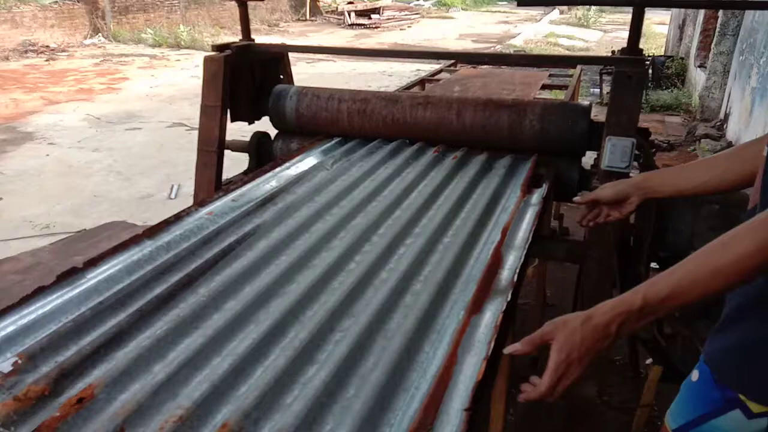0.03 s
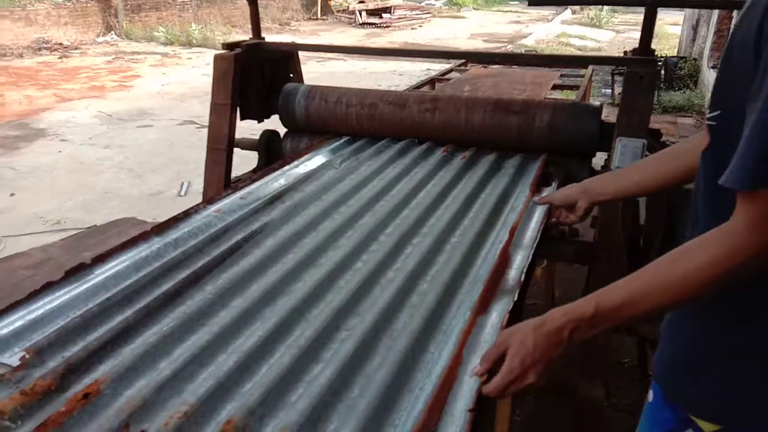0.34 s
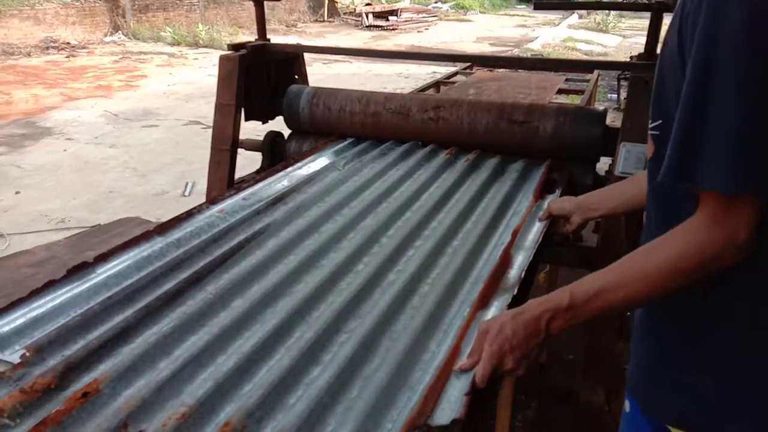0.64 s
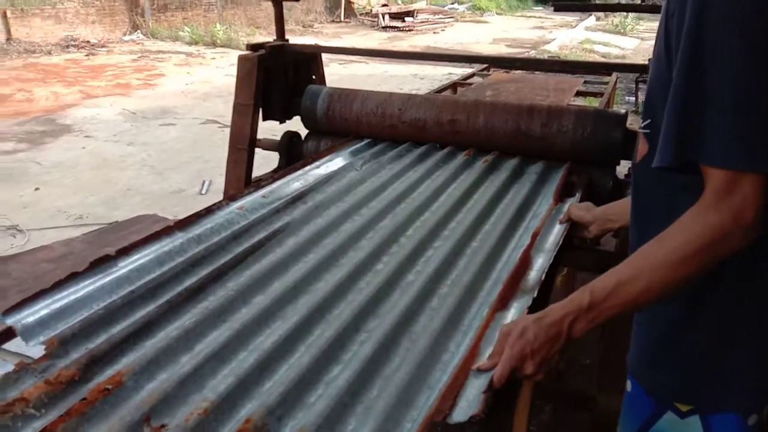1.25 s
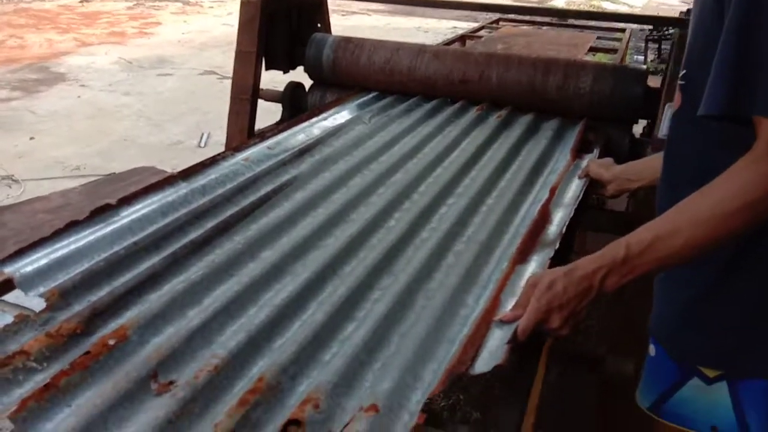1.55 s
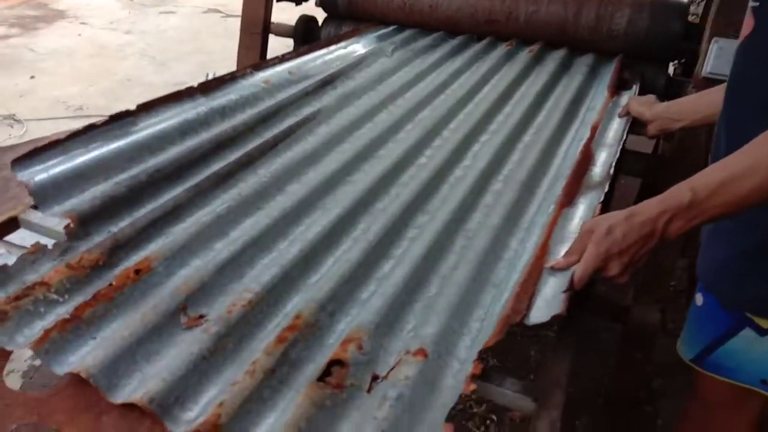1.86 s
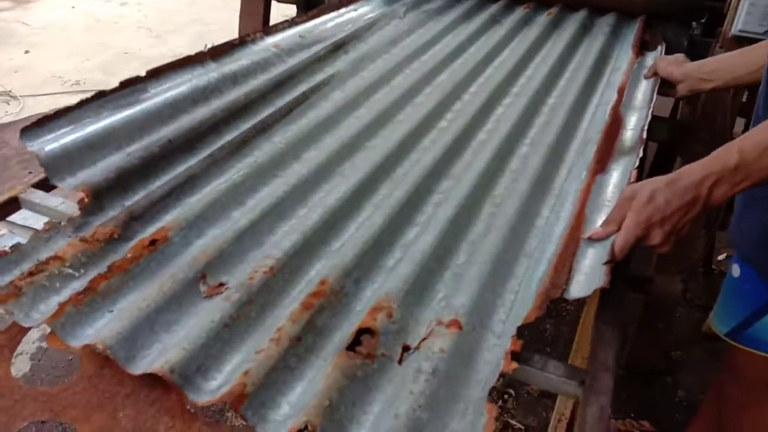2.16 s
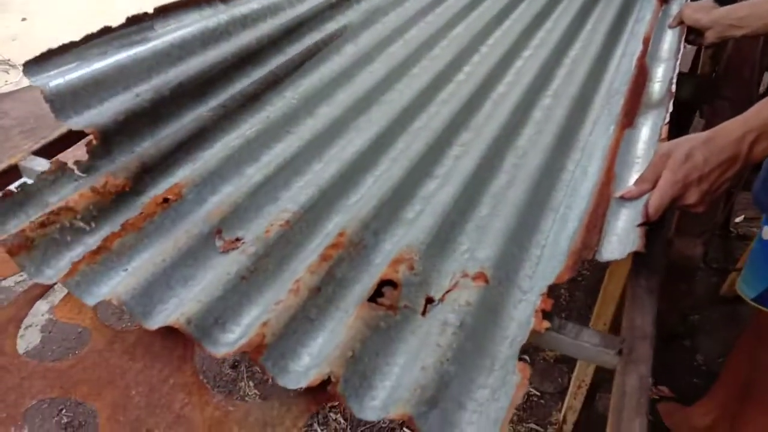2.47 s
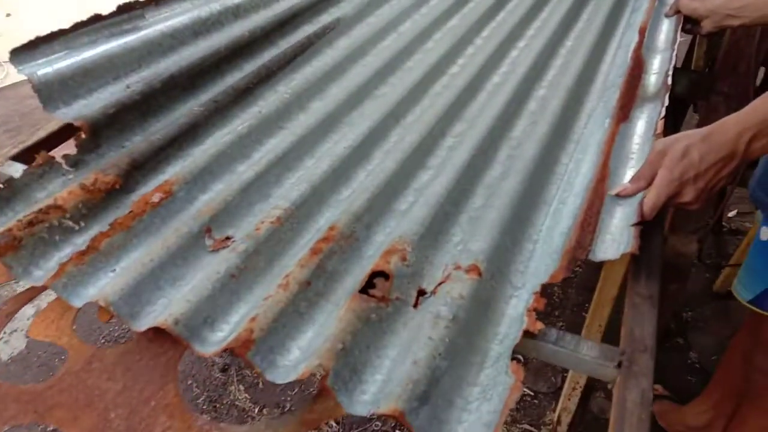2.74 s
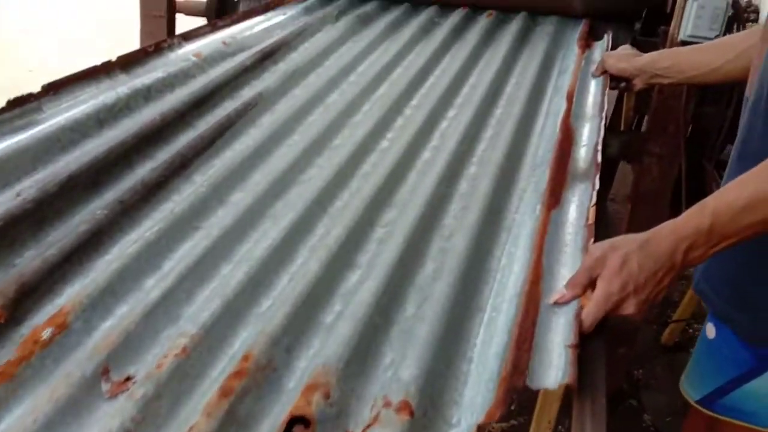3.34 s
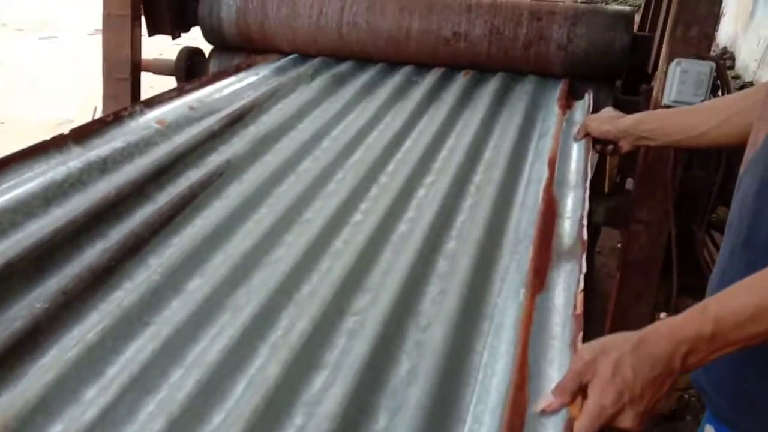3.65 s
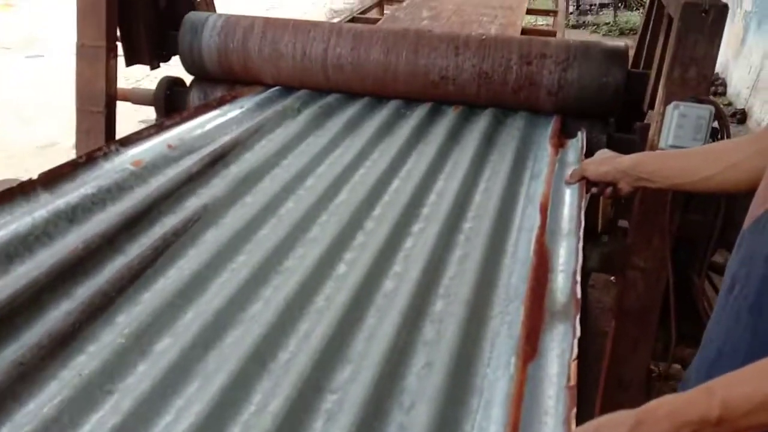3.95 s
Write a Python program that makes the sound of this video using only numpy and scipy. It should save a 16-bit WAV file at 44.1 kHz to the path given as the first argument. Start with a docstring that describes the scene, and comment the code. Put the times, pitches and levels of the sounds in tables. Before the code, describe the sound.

A corrugated metal sheet grates through a roller machine, close by in an open yard. The bright crackling starts in surges, then turns continuous with rattling and sharp clanks, over ringing gears and a low motor hum.

```python
"""In an open yard, close by, a motor-driven roller pulls a corrugated iron sheet through.
The sheet grates on the rollers with a dense, bright crackle, shudders as it bends, and buckles
with sharp clanks. Beneath it the gears ring, a dry bearing squeals early on, the frame thumps
and rumbles, and the motor hums. The sound fades in, and a limiter turns it down at loud peaks."""
import sys
import numpy as np
from scipy import signal
from scipy.fft import rfft, irfft
from scipy.io import wavfile
from scipy.ndimage import uniform_filter1d, minimum_filter1d

SR = 44100
rng = np.random.default_rng(int(sys.argv[2]) if len(sys.argv) > 2 else 0)


def inscribe(sig):
    """Save sig as 16-bit PCM at rate SR to the path in sys.argv[1].

    A 1-D sig is mono; a 2-D sig holds one channel per row.
    Samples are clipped to [-1, 1] before scaling.
    """
    pcm = np.round(np.clip(np.atleast_2d(sig).T, -1, 1) * 32767)
    wavfile.write(sys.argv[1], SR, pcm.astype(np.int16))


N = 176400
T = np.arange(N) / SR

# How loudly the sheet grates: t/s, level/dB (levels in all tables are relative)
SCRAPE_LEVELS = [(.2, -49), (.43, -36), (.49, -45), (.53, -30), (.6, -42), (.71, -39.5), (.77, -24.5),
                 (.83, -20), (.89, -28), (.94, -33), (1.0, -38), (1.09, -37.5), (1.21, -31.5), (1.24, -22),
                 (1.28, -17.5), (1.31, -29.5), (1.39, -18), (1.45, -28), (1.53, -32.5), (1.6, -23),
                 (1.82, -24.5), (1.95, -25), (2.14, -22), (2.42, -23), (2.56, -23.5), (2.78, -20),
                 (2.86, -21), (3.2, -23.5), (3.38, -20.5), (3.5, -22), (3.65, -22), (3.95, -21)]
# Tone of the grating: f/Hz, level/dB
SCRAPE_TONE = [(300, -32), (1200, -11.5), (2900, -14.5), (4300, -5), (5200, -12), (6150, -5.5),
               (6550, -10.5), (7000, -1), (7450, 0.5), (8050, -10.5), (9100, -21.5), (10300, -20.5),
               (12200, -32), (13800, -24.5), (14700, -17), (15600, -16.5)]
# How loudly the sheet shudders: t/s, level/dB
SHUDDER_LEVELS = [(0.2, -47), (0.36, -36), (0.73, -39), (0.82, -24.5), (1.03, -33.5), (1.19, -36.0),
                  (1.28, -24.5), (1.37, -32.5), (1.6, -31), (1.74, -27), (1.83, -26.5), (1.9, -28.5),
                  (2.14, -26), (2.4, -27.5), (2.56, -24), (2.84, -28.5), (3.06, -26), (3.36, -27.5),
                  (3.47, -21), (3.57, -26), (3.63, -21), (3.75, -26.5), (3.93, -25.5)]
# Tone of the shudder: f/Hz, level/dB
SHUDDER_TONE = [(30, -26), (60, -23.5), (125, -4), (170, -6), (240, -6.5), (310, -9.5), (420, -6.5),
                (550, -1.5), (800, -1), (1050, -2.5), (1600, 0), (2200, -4.5), (3000, -11.5), (6000, -15),
                (16000, -71)]
# The sheet's boom, then its note against the roller: f/Hz, width/Hz, level/dB
SHEET_NOTES = [(371, 40, 0), (1244, 55, 10)]
# The sheet buckles or slips: t/s, level/dB, centre f/Hz, width/octaves, decay/s
BUCKLES = [(.163, -32, 5860, 0.66, 0.0052), (.92, -22, 4330, 0.057, 0.026), (1.378, -17, 6000, .5, 0.011),
           (1.429, -15, 6750, 0.36, 0.0057), (1.547, -15.5, 6300, 0.43, 0.015),
           (1.561, -10.5, 7500, 0.067, .009), (1.613, -12.5, 4740, 0.31, 0.013),
           (1.636, -9, 5540, 0.45, .012), (1.714, -13, 7400, 0.1, .01), (1.805, -19, 1020, 0.67, 0.065),
           (1.849, -10, 1400, 0.44, 0.0046), (1.889, -11.5, 7200, 0.15, .002),
           (2.107, -11.5, 2190, 1.6, 0.011), (2.131, -13, 5450, 0.67, 0.0041),
           (2.148, -16, 2130, 1.2, 0.017), (2.202, -11.5, 1430, 0.91, 0.0063),
           (2.209, -13, 1700, 0.96, 0.015), (2.301, -2, 6900, 0.35, 0.0013),
           (2.35, -6.5, 4200, 0.57, 0.0024), (2.461, -5, 1260, 0.8, 0.013),
           (2.521, -16.5, 6860, 0.15, .018), (2.766, -15, 4570, 0.87, 0.016),
           (2.783, -18, 1540, 0.69, 0.018), (2.932, -5.5, 1780, 0.78, 0.0077),
           (3.016, -18.5, 3930, 0.099, .015), (3.091, -13, 1960, 0.26, 0.0095),
           (3.14, -9.5, 1250, 0.12, 0.0056), (3.243, 7, 4600, 0.43, .0016),
           (3.297, -5.5, 7240, 0.2, 0.0023), (3.392, -3.5, 2450, 0.95, 0.0033),
           (3.432, -4.5, 6740, 0.2, 0.002), (3.462, -19.5, 1180, 0.83, 0.015),
           (3.543, -7, 1840, 1.6, 0.0065), (3.612, -14, 1300, 0.85, 0.0085),
           (3.671, -10, 1450, 0.45, 0.003), (3.685, -8, 2380, 1.2, 0.013), (3.698, -4, 1600, 0.58, 0.0049),
           (3.873, -1.5, 1610, .4, 0.0048), (3.886, -6.5, 5100, 0.45, 0.0087), (3.971, 0, 6800, 0.26, .003)]
# Notes at which the gears ring: f/Hz, width/Hz, level/dB
GEAR_NOTES = [(724, 52, -8.5), (881, 84, -7.5), (1200, 123, 0.5), (1613, 86, -7.5), (2060, 70, -14),
              (4220, 310, -12), (6400, 38, -25), (7700, 300, -22)]
# How loudly the bearing squeals: t/s, level/dB
SQUEAL_LEVELS = [(.25, -56), (.33, -39), (.42, -35), (.53, -48.5), (.64, -29.5), (.72, -43), (.83, -29),
                 (1.03, -42), (1.15, -33), (1.3, -34), (1.6, -58)]
# Knocks of the frame: t/s, level/dB
FRAME_THUMPS = [(.365, -29), (0.589, -31), (.73, -33), (1.18, -35), (1.289, -36), (1.465, -31),
                (1.768, -28.5), (1.92, -32), (2.319, -30), (2.565, -32), (3.333, -32)]
# Notes of the motor's hum: f/Hz, level/dB
HUM_NOTES = [(100, -45.5), (200, -60)]
# Tone of the frame's rumble: f/Hz, level/dB
RUMBLE_TONE = [(20, -50), (45, -33), (75, -9), (110, 3), (135, 6.5), (165, -8.5), (220, -11), (300, -18),
               (1000, -34), (4000, -66)]
# The opening fade: t/s, level/dB
FADE_LEVELS = [(.108, -70), (.115, -26), (.16, -10.5), (.3, -5.5)]


def scrape(gain_db=4.45, fizz_hz=8700, fizz_full_db=-33):
    """Rust and ridges grate on the rollers in dense crackle, brighter the harder they press."""
    grit = rattle(hits_per_s=2200, spread_db=2.8, decay_s=0.0047, burst_db=1.9, slips_per_s=60)
    grit = unit(colour(grit, SCRAPE_TONE))
    level_db = curve(SCRAPE_LEVELS)
    dull = signal.sosfiltfilt(signal.butter(6, fizz_hz, fs=SR, output="sos"), grit)
    fizz = (grit - dull) * amp(0.15 * (level_db - fizz_full_db))
    return amp(gain_db + level_db) * (dull + fizz)


def shudder(gain_db=2.98):
    """The bending sheet knocks against the roller and the table, which makes it ring."""
    knocks = rattle(hits_per_s=1000, spread_db=2.1, decay_s=0.008, burst_db=1.7, slips_per_s=45)
    knocks = colour(knocks, SHUDDER_TONE)
    ring = sum(amp(db) * resonate(knocks, hz, width) for hz, width, db in SHEET_NOTES)
    return amp(gain_db + curve(SHUDDER_LEVELS)) * unit(knocks + ring)


def clanks(rise_s=0.0004, tail_db=-20.5, tail_s=0.042):
    """Each buckle rings a cluster of close notes, loudest at the snap and soon stilled by the rollers."""
    out = np.zeros(N + SR)
    t = np.arange(8192) / SR
    hz = np.fft.rfftfreq(len(t), 1 / SR) + 1
    for start, db, centre, octaves, decay in BUCKLES:
        distance = np.log2(hz / centre) / octaves
        cluster = np.minimum(centre / hz, 1) ** 0.5 / (1 + distance ** 2 / 2) ** 2
        ring = irfft(rfft(rng.standard_normal(len(t))) * cluster)
        ring /= np.sqrt(uniform_filter1d(ring ** 2, size=110) + 1e-12)  # even out the loudness
        rise = np.minimum(t / rise_s, 1)
        fall = np.exp(-t / decay) + amp(tail_db) * np.exp(-t / tail_s)
        at = round(start * SR)
        out[at:at + len(t)] += amp(db) * ring * rise * fall
    note_hz, width_hz, _ = SHEET_NOTES[-1]
    return out[:N] + resonate(out[:N], note_hz, width_hz)


def gears(gain_db=-32):
    """Chattering gear teeth keep the machine ringing on several wavering notes."""
    teeth = rattle(hits_per_s=900, spread_db=2, decay_s=0.003, burst_db=1.6, slips_per_s=22)
    ring = sum(amp(db + 4 * wander(18)) * resonate(teeth, hz, width) for hz, width, db in GEAR_NOTES)
    band = signal.butter(3, [280, 8200], "band", fs=SR, output="sos")
    return amp(gain_db) * unit(signal.sosfilt(band, ring))


def squeal(hz=2082, width_hz=120):
    """A dry roller bearing rubs and sings on one rough note."""
    rubbing = resonate(rng.standard_normal(N), hz, width_hz)
    note = resonate(rubbing, hz, width_hz)
    return amp(curve(SQUEAL_LEVELS)) * unit(note)


def thumps(hz=111.3, rise_s=0.012):
    """The frame gives soft, low knocks under the load."""
    out = np.zeros(N)
    for start, db in FRAME_THUMPS:
        t = np.maximum(T - start, 0)
        swell = t / rise_s * np.exp(1 - t / rise_s)
        out += amp(db) * swell * np.sin(2 * np.pi * hz * t)
    return out


def motor(rumble_db=-48, usual_load_db=-34):
    """The motor hums steadily, and the frame's lumpy rumble grows as the sheet bends."""
    sway = 0.076 * wander(4)
    hum = sum(amp(db) * np.sqrt(2) * np.sin(2 * np.pi * hz * T + sway) for hz, db in HUM_NOTES)
    lumps = colour(rng.standard_normal(N) * amp(3.9 * wander(14)), RUMBLE_TONE)
    extra_load_db = curve(SHUDDER_LEVELS) - usual_load_db
    return hum + amp(rumble_db + 0.28 * extra_load_db) * unit(lumps)


def rattle(hits_per_s, spread_db, decay_s, burst_db, slips_per_s, spots=24, slip_decay_s=0.012):
    """Tiny uneven hits grow suddenly louder at each slip; every spot they strike rings briefly."""
    sizes = amp(spread_db * np.minimum(rng.exponential(1, N), 4))
    hits = sizes * (rng.random(N) < hits_per_s / SR)
    slip_starts = rng.random(N) < slips_per_s / SR
    slips = signal.lfilter([1], [1, -np.exp(-1 / (slip_decay_s * SR))], slip_starts)
    bursts = amp(burst_db * 2 * np.tanh(unit(slips - slips.mean()) / 2))
    hits = hits * bursts * rng.choice([-1, 1], N)
    spot = rng.integers(0, spots, N)
    t = np.arange(2048) / SR
    rings = rng.standard_normal((spots, len(t))) * np.exp(-t / decay_s)
    return unit(sum(signal.oaconvolve(hits * (spot == k), unit(rings[k]))[:N] for k in range(spots)))


def resonate(x, hz, width_hz):
    """Makes x ring at one note; a narrower width rings longer."""
    fade = np.exp(-np.pi * width_hz / SR)
    return 2 * signal.lfilter([1 - fade], [1, -fade * np.exp(2j * np.pi * hz / SR)], x).real


def colour(x, tone):
    """Shapes the lows and highs of x to follow a table of f/Hz, level/dB."""
    hz, db = np.transpose(tone)
    grid_hz = abs(np.fft.fftfreq(4096, 1 / SR)) + 1
    log_gain = np.log(amp(np.interp(np.log(grid_hz), np.log(hz), db)))
    response = np.exp(np.conj(signal.hilbert(log_gain)))  # rings after a hit, never before
    return signal.oaconvolve(x, np.fft.ifft(response).real)[:N]


def wander(rate_hz):
    """A slow random drift, mostly below the given rate."""
    hz = np.fft.rfftfreq(N, 1 / SR)
    spectrum = rfft(rng.standard_normal(N))
    return unit(irfft(spectrum * hz / (hz + 3) / (1 + (hz / rate_hz) ** 2), N))


def curve(points):
    """Joins the points of a time table with straight lines."""
    return np.interp(T, *np.transpose(points))


def unit(x):
    """Scales x to an average strength (rms) of 1."""
    return x / np.sqrt(np.mean(x ** 2) + 1e-20)


def amp(db):
    """Turns decibels into a multiplier."""
    return 10 ** (np.asarray(db) / 20)


def scene():
    """The whole machine, close by in the open air, in one channel."""
    return (scrape() + shudder() + clanks() + gears() + squeal() + thumps() + motor())[None]


def record(dry, ceiling_db=-10, look_ahead_s=0.013, recover_db_per_s=126, boost_db=1):
    """Fades in, turns down just ahead of each loud peak, and trims the deepest bass and top treble."""
    ahead = int(look_ahead_s * SR)
    level_db = 10 * np.log10(abs(uniform_filter1d(dry[0] ** 2, size=80)) + 1e-12)
    excess_db = np.maximum(level_db - ceiling_db, 0)
    coming_db = -minimum_filter1d(-excess_db, ahead, origin=-(ahead // 2))  # biggest excess just ahead
    recovery_db = T * recover_db_per_s
    dip_db = uniform_filter1d(np.maximum.accumulate(coming_db + recovery_db) - recovery_db, size=64)
    bass_cut = signal.butter(2, 42, "high", fs=SR, output="sos")
    treble_cut = signal.firwin(1201, 15500, window=("kaiser", 9), fs=SR)
    out = signal.sosfilt(bass_cut, dry) * amp(curve(FADE_LEVELS) + boost_db - dip_db)
    return signal.oaconvolve(out, treble_cut[None], "same")


dry = scene()
out = record(dry)
inscribe(out)
```